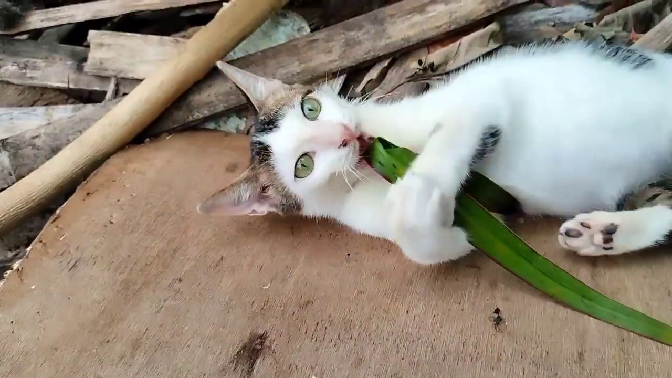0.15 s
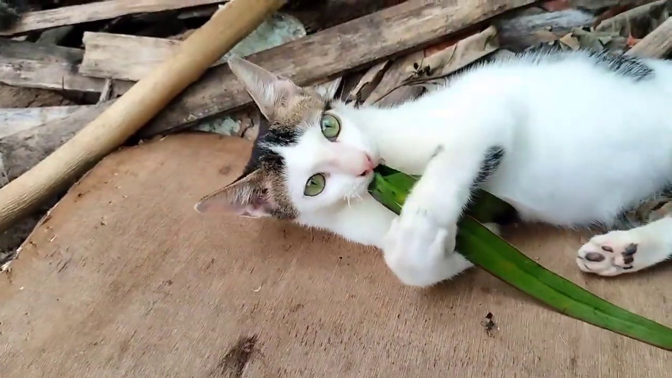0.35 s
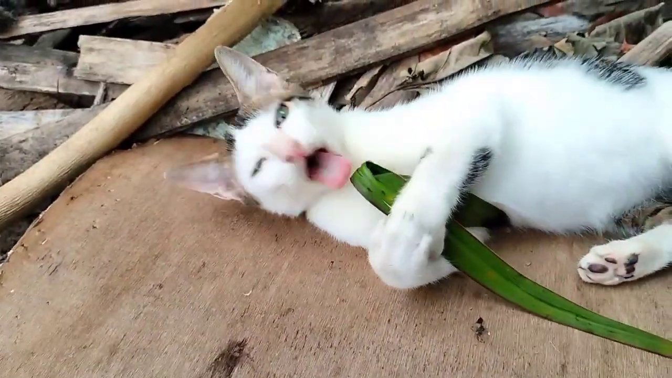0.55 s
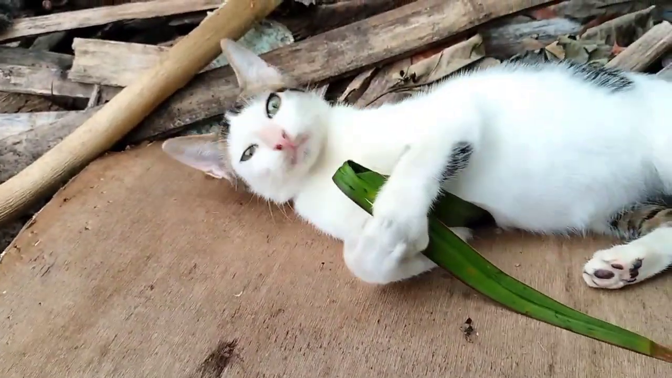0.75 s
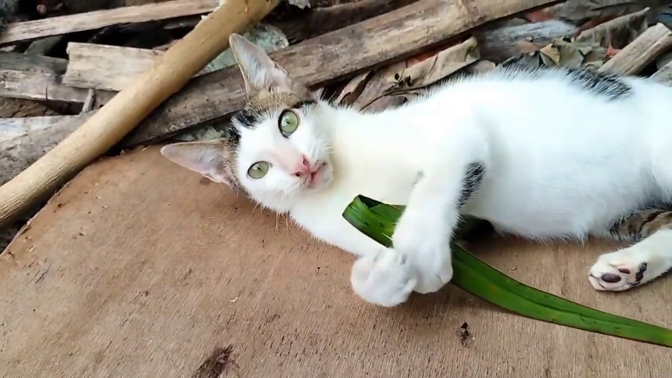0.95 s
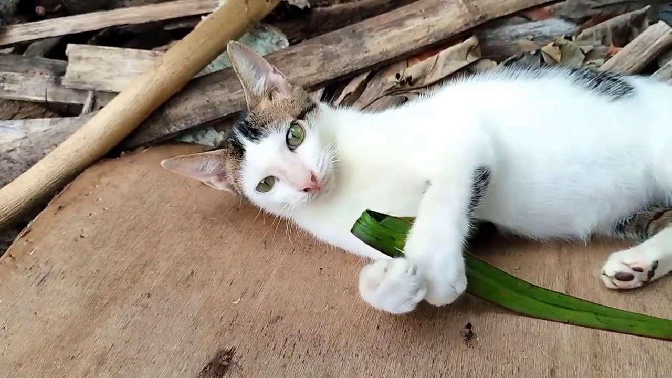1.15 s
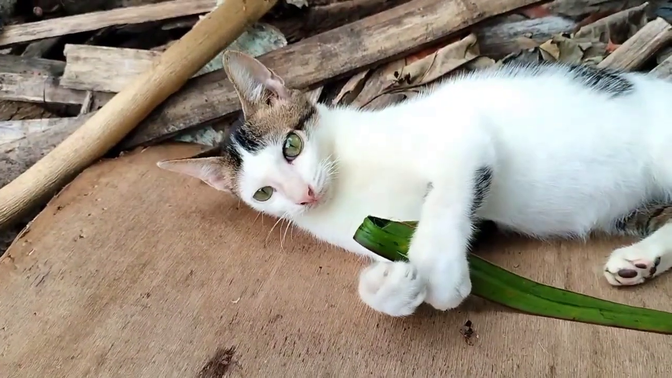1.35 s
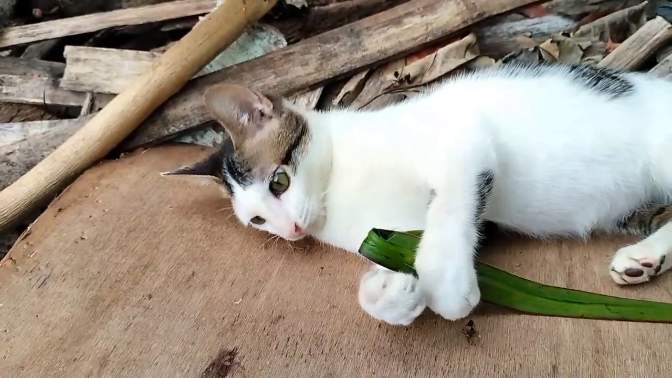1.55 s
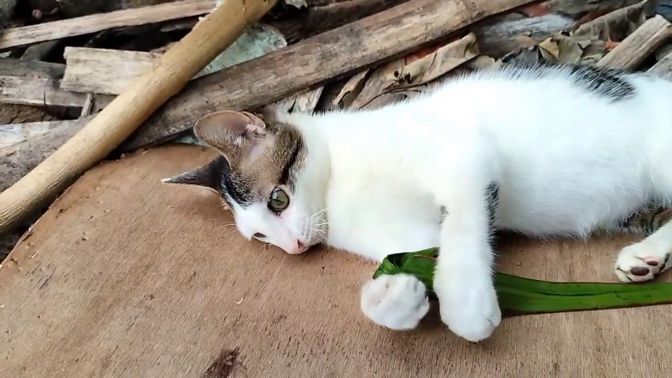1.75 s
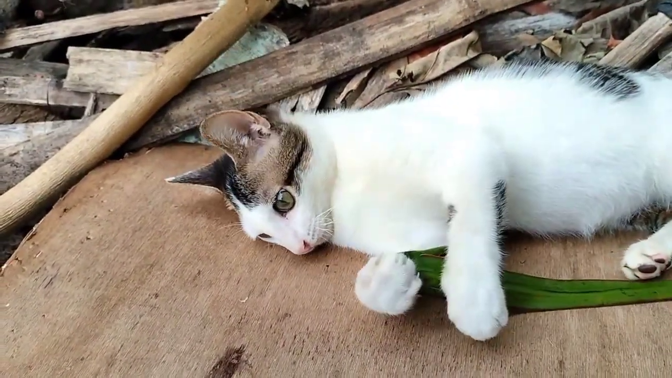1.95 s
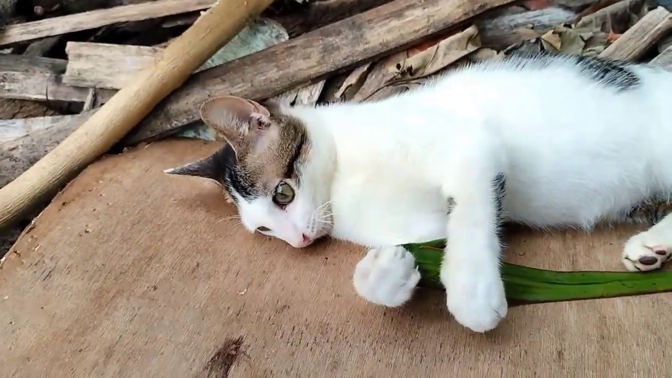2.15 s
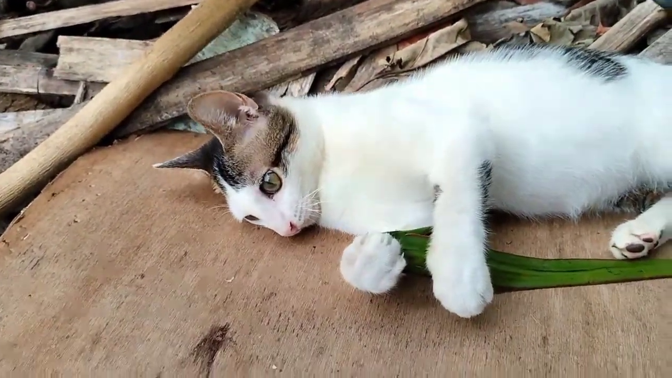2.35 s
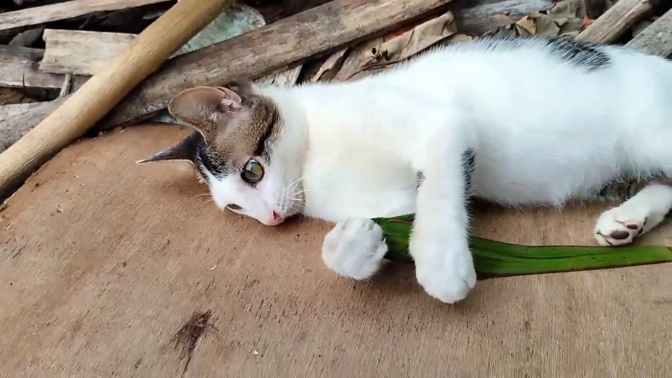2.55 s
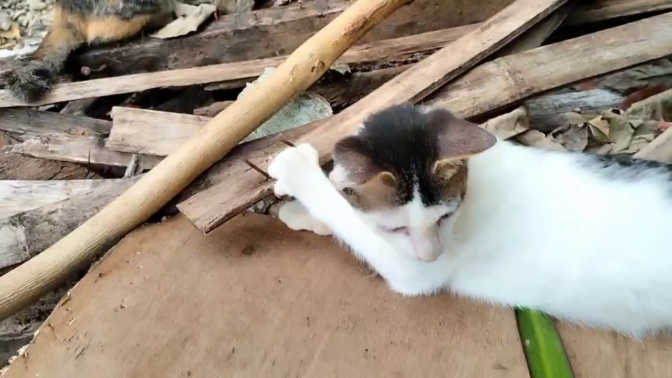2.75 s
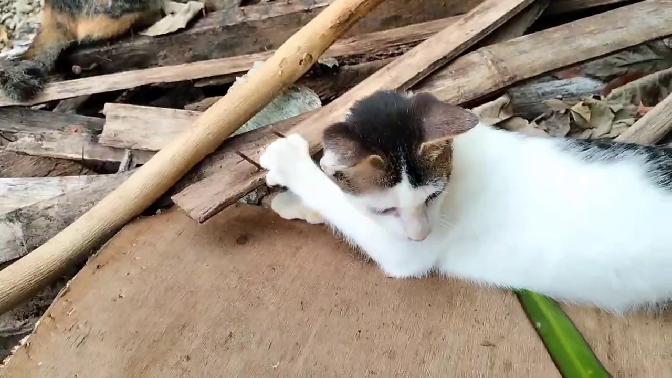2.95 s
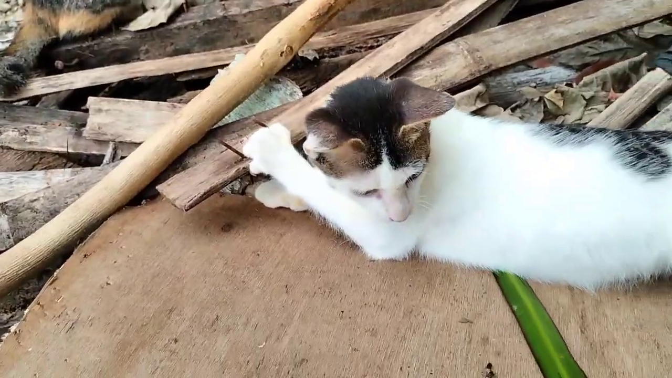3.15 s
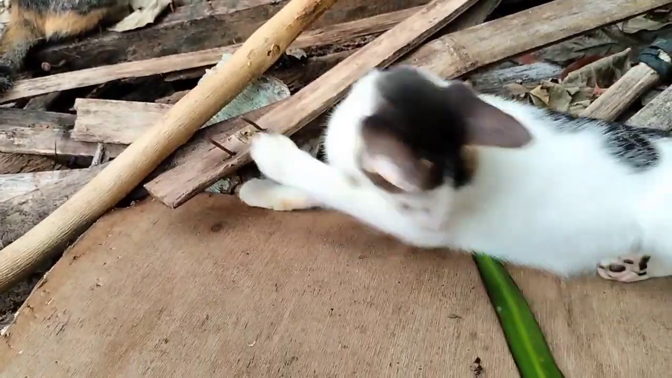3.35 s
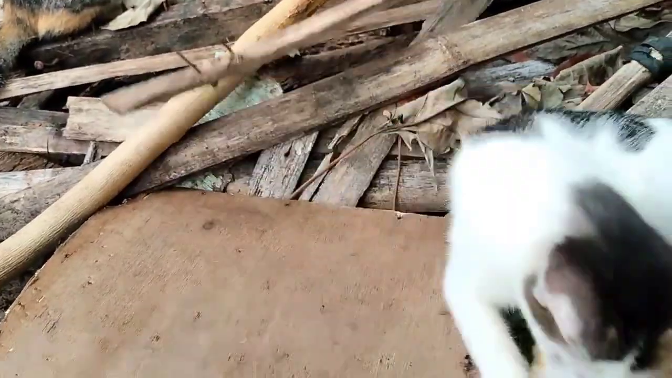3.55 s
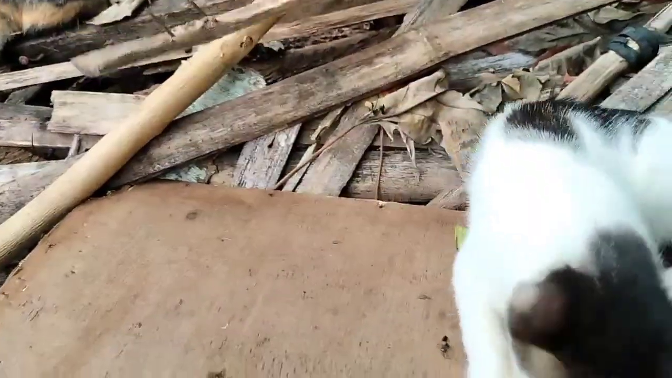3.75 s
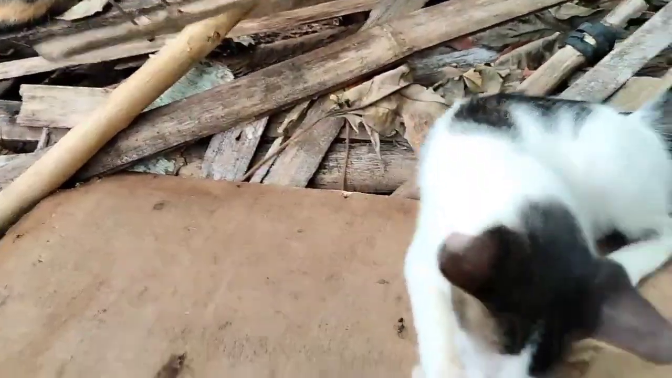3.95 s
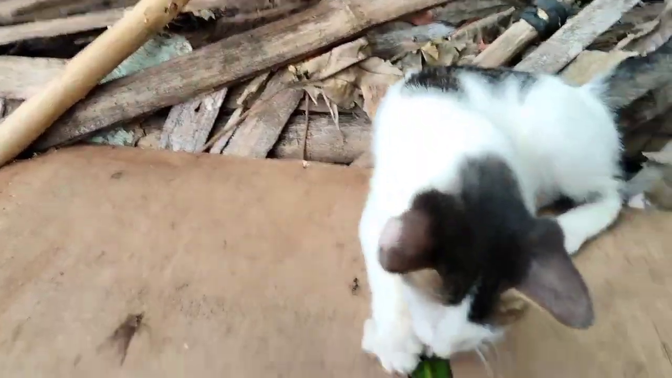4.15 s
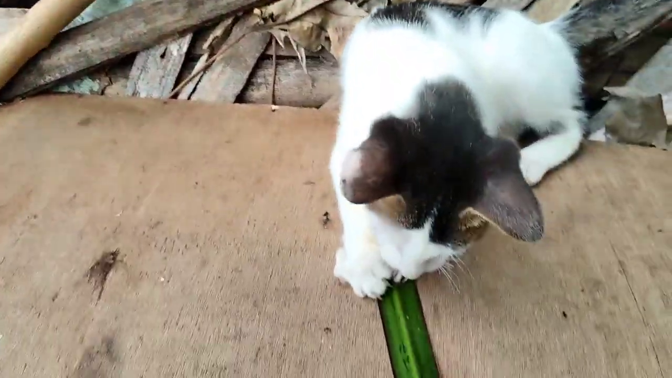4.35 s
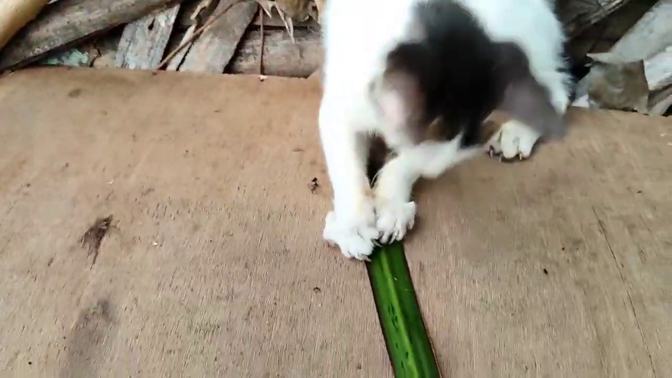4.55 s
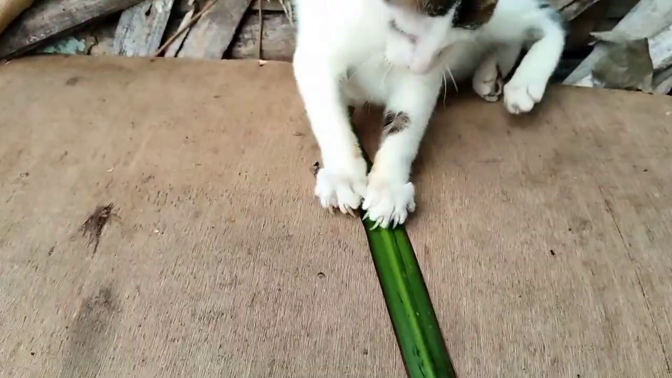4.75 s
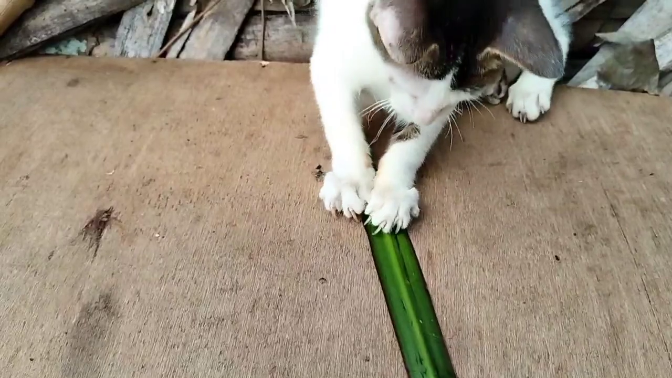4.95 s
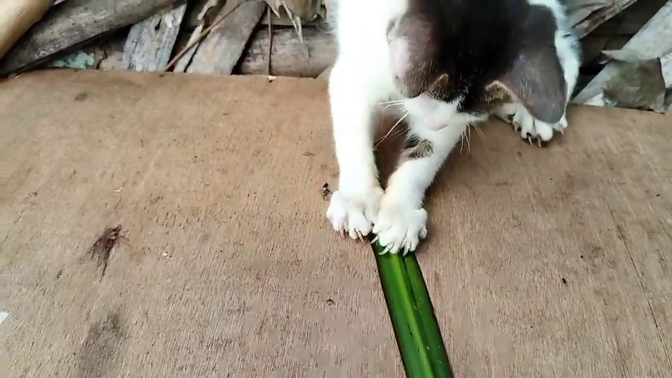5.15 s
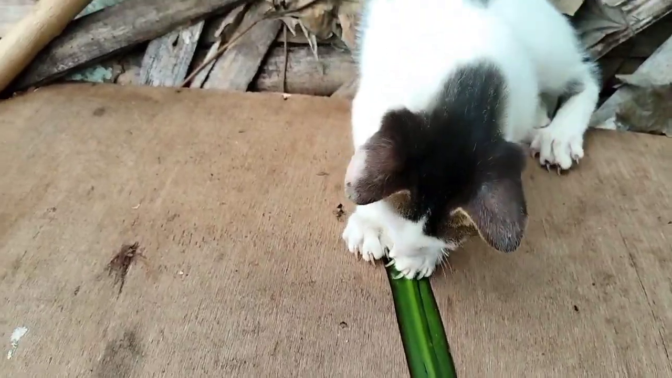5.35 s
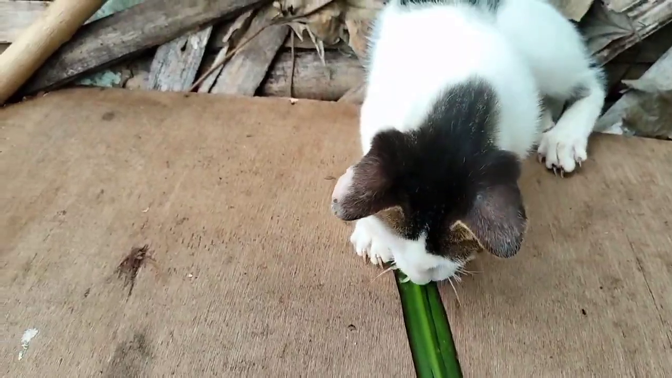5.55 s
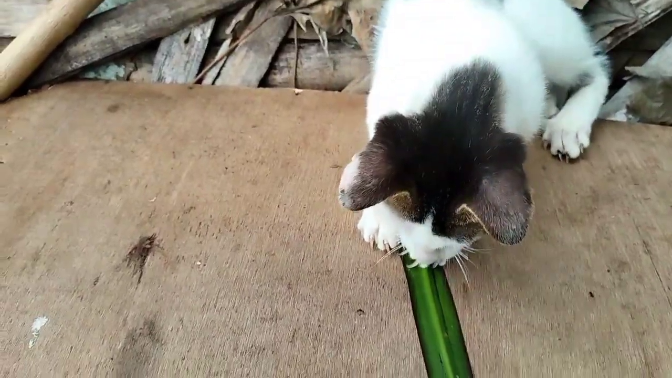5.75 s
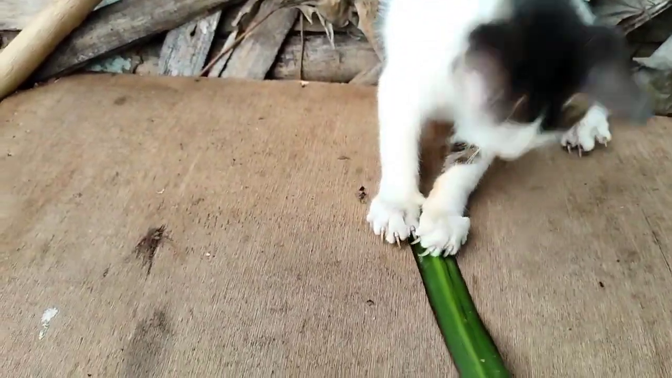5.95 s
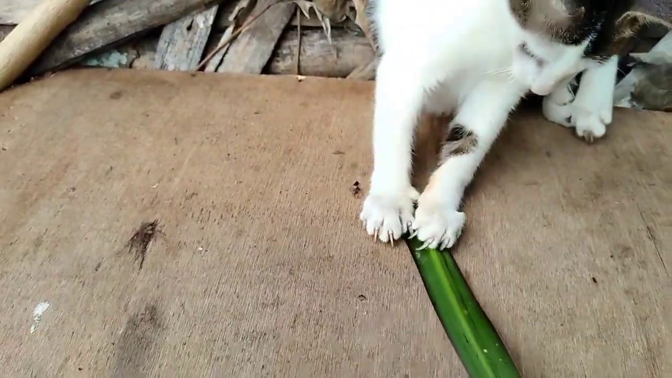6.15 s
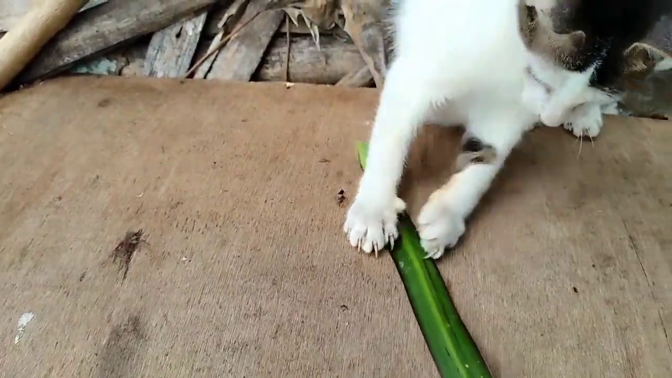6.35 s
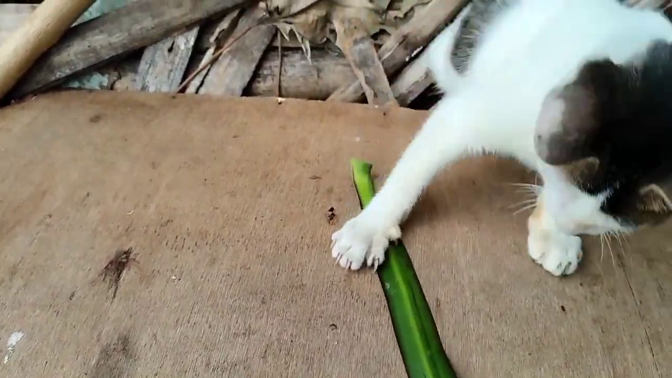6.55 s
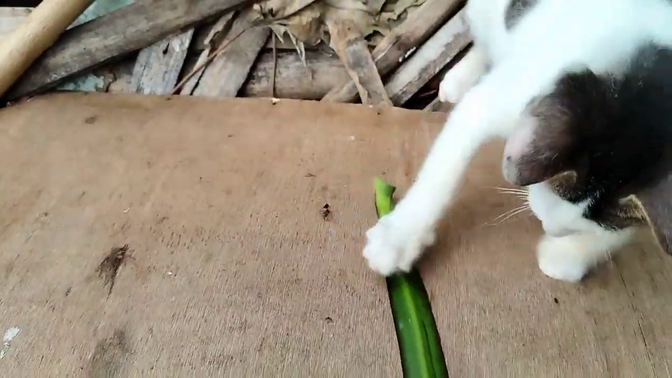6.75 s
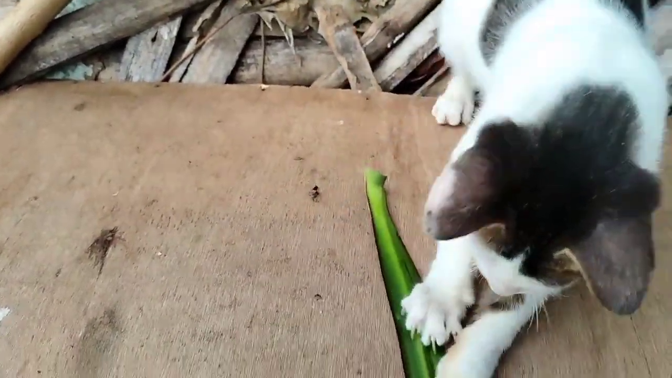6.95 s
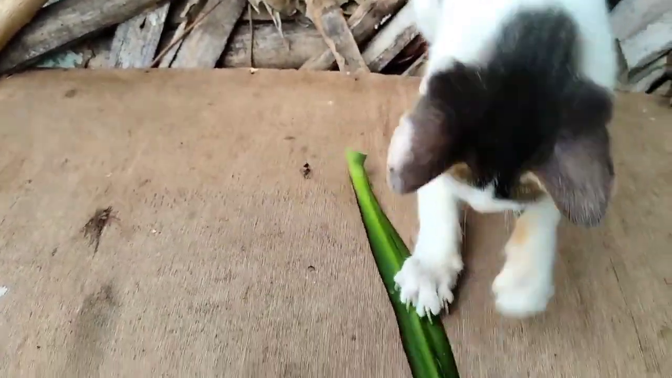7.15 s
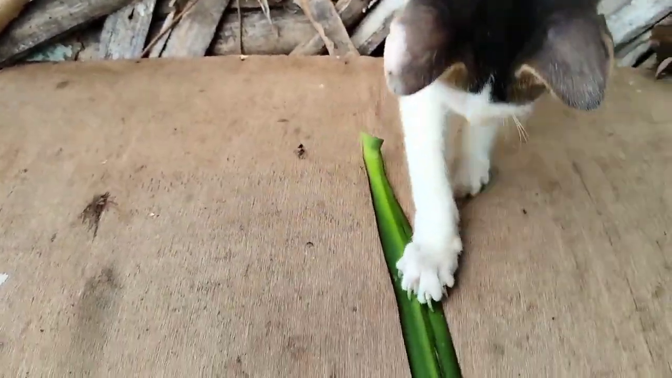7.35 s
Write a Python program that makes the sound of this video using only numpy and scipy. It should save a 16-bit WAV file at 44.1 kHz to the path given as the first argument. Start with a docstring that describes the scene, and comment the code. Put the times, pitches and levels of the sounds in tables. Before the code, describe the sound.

For the first three seconds, small birds chip, twitter and give short high whistles in a slightly echoing yard, over a faint outdoor hiss and rumble. Three soft, distant broom-like swishes pass at about 0.7, 1.4 and 2.2 seconds. The background dips briefly just before 3 seconds. Around 3.6 seconds a kitten pounces on a thin wooden board close to the microphone: a loud, hollow double thump with a short low shudder and sharp cracks of claws and a stiff leaf. From about 4.6 to 5.4 seconds come lighter dry snaps and rasping scratches that knock hollowly in the wood. The birds continue more faintly, with a few rising trills between 5 and 6 seconds. Scratching picks up again from 6 seconds, building to another thump and sharp crack at about 6.9, then a few last snaps and scrapes around 7.2 seconds.

```python
"""A kitten pounces on a thin wooden board outdoors and scratches at a long stiff leaf, close to a phone. Its
paws thump the board's low modes and leave it shuddering; claws and leaf snap and rasp in stick-slip strokes
that knock hollowly in the wood. Behind it, birds chip and whistle in an echoing yard and something like a broom
swishes far off. The background noise rises and falls as it goes."""
import sys
import numpy as np
from scipy import signal
from scipy.fft import rfft, irfft
from scipy.io import wavfile
from scipy.ndimage import uniform_filter1d

SR = 44100
rng = np.random.default_rng(int(sys.argv[2]) if len(sys.argv) > 2 else 0)


def to_wav(s):
    """Save 16-bit WAV."""
    ch = np.atleast_2d(s).T  # columns
    pcm = np.round(np.clip(ch, -1, 1) * 32767)  # PCM
    wavfile.write(sys.argv[1], SR, pcm.astype(np.int16))


N = 325899


def undb(db):
    return 10 ** (np.asarray(db) / 20)


def unit(x):
    return x / np.sqrt(np.mean(x ** 2))


def pan(db):
    """Stereo gains for a left-minus-right balance in dB."""
    return undb(np.array([[db], [-db]]) / 2)


def curve(rows):
    """An automation lane for each column after time, then a soft gate over the table's span."""
    times, *columns = np.transpose(rows)
    t = np.arange(N) / SR
    gate = np.clip(np.minimum(t - times[0], times[-1] - t) / 0.015 + 1, 0, 1)
    return [np.interp(t, times, column) for column in columns] + [gate]


def stroke(peak_s, rise_s, fall_s):
    """Envelope with a slightly rounded peak, 30 dB down at rise_s before it and fall_s after."""
    late = np.arange(N) / SR - peak_s
    return undb(-30 * np.maximum(-late / rise_s, late / fall_s) ** 1.154)


def colour(x, shape):
    """Minimum-phase EQ of unit energy, drawn through (Hz, dB) points."""
    hz, db = np.transpose(shape)
    f = np.maximum(np.fft.rfftfreq(4096, 1 / SR), 1)
    cepstrum = irfft(np.interp(np.log(f), np.log(hz), db) * np.log(10) / 20)
    cepstrum[1:2048] *= 2  # folding makes the filter causal
    cepstrum[2049:] = 0
    impulse = irfft(np.exp(rfft(cepstrum)))[:2048]
    impulse /= np.sqrt(np.sum(impulse ** 2))
    return signal.fftconvolve(np.atleast_2d(x), impulse[None], axes=1)[:, :N]


def band(x, lo_hz, hi_hz):
    return signal.sosfilt(signal.butter(2, [lo_hz, hi_hz], "bandpass", fs=SR, output="sos"), x)


def ring(x, hz, t60):
    """One decaying mode; a unit impulse rings with unit size."""
    r, w = np.exp(-np.log(1000) / (t60 * SR)), 2 * np.pi * hz / SR
    return signal.lfilter([0, r * np.sin(w)], [1, -2 * r * np.cos(w), r * r], x)


def walk(rate_hz):
    """Slewed random sample-and-hold, with a spread near 1."""
    hold = int(SR / rate_hz)
    steps = np.repeat(rng.standard_normal(N // hold + 1), hold)
    return 1.2 * uniform_filter1d(steps, hold)[:N]


def stereo_noise(width):
    """White noise, mono at width 0 and unrelated left and right at 1."""
    mid, side = rng.standard_normal((2, N))
    return (mid + width * side * np.array([[1], [-1]])) / np.sqrt(1 + width ** 2)


def grit(per_s, spread_db, width):
    """Friction texture: noise broken into slips of very uneven size."""
    slips = (rng.random(N) < per_s / SR) * undb(spread_db * rng.exponential(size=N))
    envelope = signal.lfilter([1], [1, -np.exp(-1 / (0.0021 * SR))], slips)
    return unit(stereo_noise(width) * (envelope + 0.29 * np.mean(envelope)))


# Low-end EQ of the background noise, also of the board's shudder: f/Hz, level/dB
RUMBLE_EQ = [(15, -49.5), (25, -15), (43, -16.5), (114, 0), (184, -4.5), (249, -3.5), (317, -12),
             (400, -13.5), (520, -49.5), (880, -120)]
# EQ of the background noise's mids and treble: f/Hz, level/dB
NOISE_EQ = [(15, -37), (25, -7), (242, 1), (335, -10), (545, -12), (2000, -14), (2480, -16), (4490, -11.5),
            (7110, -12.5), (8360, -21), (9570, -38.5), (11900, -42), (16000, -35.5)]
# Background noise level, rising and falling over time: # t/s, bass/dB, mids/dB, treble/dB
NOISE_FADERS = [(0, -68.5, -67.5, -54), (.18, -72.5, -74, -72.5), (.48, -69, -71.5, -57.5),
                (.8, -71, -73, -69.5), (1.05, -68, -72.5, -64.5), (1.3, -71, -72.5, -68),
                (1.68, -66.5, -70, -60), (2.05, -72, -75.5, -65.5), (2.36, -68, -72, -57.5),
                (2.7, -70.5, -73, -63), (2.98, -81, -84.5, -72), (3.3, -81.5, -83.5, -77),
                (3.62, -67.5, -76, -58), (3.95, -78.5, -81.5, -76), (4.45, -81, -80.5, -75),
                (4.75, -75, -74.5, -65), (5.05, -79.5, -80, -88), (5.3, -76.5, -79, -70),
                (5.6, -83.5, -85.5, -85), (5.95, -79.5, -84, -72.5), (6.1, -75, -78, -72.5),
                (6.42, -83, -78, -72.5), (6.73, -74.5, -69, -63), (7.1, -80.5, -69.5, -74.5),
                (7.39, -68.5, -62.5, -65)]


def background_noise():
    """Noise bed: narrow bands flicker independently, wider in stereo toward the top."""
    ranges = [(23.7, 340, RUMBLE_EQ), (333.3, 2370, NOISE_EQ), (2265, 14900, NOISE_EQ)]
    out = 0
    for (lo_hz, hi_hz, eq), db in zip(ranges, curve(NOISE_FADERS)[:3]):
        layer = 0
        edges = np.geomspace(lo_hz, hi_hz, num=11)
        for lower, upper in zip(edges, edges[1:]):
            flicker = undb(3.08 * walk(12))
            noise = stereo_noise(width=min(lower / 2500, .9) + 0.67)
            layer = layer + flicker * band(noise, lower, upper)
        out = out + undb(db) * unit(colour(layer, eq))
    return out


def chip(db, hz, length_s, pan_db, fall):
    """A raspy bird note: slurred, unsteady in pitch, with a fast throb that adds sidebands."""
    progress = np.linspace(0, 1, num=int((length_s + 0.0065) * SR))
    jitter = np.interp(progress * length_s * 900, np.arange(64), rng.standard_normal(64))
    phase = 2 * np.pi * np.cumsum(hz * (1 + fall * (.5 - progress) + .032 * jitter)) / SR
    throb = 1 + 0.11 * np.sin(phase * 0.044)
    return undb(db) * np.sin(np.pi * progress) * throb * np.sin(phase) * pan(pan_db)


def glides(rows, flutter, throb_db, swell_db, fade_db):
    """Tones that glide, swell and fade, wavering in pitch and strength."""
    out = 0
    for start, peak, end, from_hz, to_hz, db, *overtone in rows:
        level, gate = curve([(start, db - swell_db), (peak, db), (end, db - fade_db)])
        hz = curve([(start, from_hz), (end, to_hz)])[0]
        tone = np.sin(2 * np.pi * np.cumsum(hz * (1 + flutter * walk(120))) / SR)
        octave = sum(overtone) * (2 * tone ** 2 - 1)
        out = out + gate * undb(level + throb_db * walk(50)) * (tone + octave)
    return out


# Fader ride on the far flock: t/s, level/dB
FLOCK_FADER = [(0, -51.5), (.2, -71.5), (.5, -61), (1.1, -59), (1.4, -57.5), (1.7, -55), (2.1, -73),
               (2.7, -52), (2.85, -99.5), (3.4, -84), (4.2, -77.5), (4.6, -74), (5.0, -80), (5.3, -74),
               (5.6, -91.5), (5.95, -71.5), (6.4, -80), (7.39, -64.5)]


def flock(count):
    """Far birds twitter: a cloud of tiny chips, scattered in time, pitch and pan."""
    out, level = np.zeros((2, N)), curve(FLOCK_FADER)[0]
    for when, pitch, distance, length, side, slur in rng.random((count, 6)):
        i = int(when * (N - 3000))
        note = chip(db=level[i] - 8 * distance, hz=2500 * 3 ** pitch, length_s=.004 + 0.014 * length,
                    pan_db=8 * side - 6, fall=.5 * slur - .2)
        out[:, i:i + note.shape[1]] += note
    return out


def yard_echo(x, t60=0.32):
    """Diffuse reflections around the yard: a decaying noise tail after 4 ms of pre-delay."""
    age = np.arange(int(.6 * SR)) / SR
    tail = rng.standard_normal((2, len(age))) * np.exp(-np.log(1000) * age / t60) * (age > .004)
    tail /= np.sqrt(np.sum(tail ** 2, axis=1, keepdims=True))
    return signal.fftconvolve(x, tail, axes=1)[:, :N]


# Faint far calls and, at 7.02 s, a short, narrow wooden knock ringing near 950 Hz:
# start/s, peak/s, end/s, from/Hz, to/Hz, level/dB, octave overtone/ratio
FAINT_TONES = [(0, .01, 0.12, 1018, 988, -57.5, 0.23), (.14, .33, 0.38, 984, 990, -58, 0.2),
               (.4, .48, 0.58, 974, 985, -71.5, 0.64), (.68, .76, 1.02, 979, 999, -67, 0.95),
               (.73, .8, 1.03, 705, 685, -71.5, 1.3), (3.14, 3.2, 3.3, 3444, 3397, -72, 0.042),
               (3.35, 3.44, 3.52, 4080, 3980, -59.5, 0.2), (4.08, 4.4, 4.56, 1074, 1131, -76.5, 1.5),
               (6.16, 6.19, 6.33, 3998, 3950, -54.5, 0.014), (6.6, 6.9, 7.5, 1790, 1793, -62.5, 0.48),
               (7.02, 7.064, 7.07, 963, 937, -58, 0.26)]
# Far rising trills: start/s, peak/s, end/s, from/Hz, to/Hz, level/dB
TRILLS = [(4.88, 4.97, 5.2, 3800, 7060, -64.5), (5.12, 5.16, 5.3, 4380, 6510, -56),
          (5.6, 5.7, 5.86, 3770, 6890, -66.5), (5.8, 5.84, 5.98, 4255, 6380, -57.5)]
# Near held whistles: start/s, peak/s, end/s, from/Hz, to/Hz, level/dB
WHISTLES = [(.225, .28, 0.42, 4723, 4568, -40.5), (.29, .35, 0.42, 4730, 5000, -45),
            (1.55, 1.67, 1.76, 4184, 3830, -35.5), (1.68, 1.73, 1.904, 4000, 3996, -46.5),
            (2.2, 2.278, 2.36, 4080, 3890, -43), (2.33, 2.38, 2.53, 3970, 3957, -46),
            (2.3, 2.45, 2.66, 4260, 4280, -55.5)]
# Near single chips: t/s, level/dB, f/Hz, length/s, pan/dB
CHIPS = [(0.216, -58, 3690, 0.015, 1), (0.477, -56.5, 3110, 0.0076, 1), (0.581, -49, 3700, 0.019, 3),
         (0.867, -46.5, 3580, 0.0087, 5), (1.08, -54.5, 3090, 0.015, 2), (1.092, -43.5, 4110, 0.034, 3),
         (1.366, -50, 3580, 0.026, 5), (1.583, -53.5, 2750, 0.028, -2.5), (2.334, -56, 3330, 0.043, 8),
         (2.388, -53, 2785, 0.02, -3), (2.721, -52.5, 3650, 0.0037, 4), (4.051, -67, 4150, 0.043, -3),
         (4.133, -68.5, 4970, 0.044, -4.5), (4.286, -58, 3950, 0.022, 1.5),
         (4.521, -58.5, 5300, 0.027, -7.5), (4.552, -60, 4660, 0.013, -6),
         (5.188, -66.5, 2635, 0.0053, -11.5), (5.705, -65, 4100, 0.016, 3)]
# Cues for one bird's falling phrase: t/s, note 1/dB, note 2/dB, note 3/dB, slide/dB, pan/dB
PHRASE_CUES = [(0.424, -44.5, -50, -50.5, -43, -7), (.944, -42, -46.5, -51.5, -43, -5),
               (1.543, -41.5, -47, -49, -42.5, -7), (2.157, -44.5, -50, -59.5, -50, -7),
               (2.643, -47.5, -53.5, -47.5, -62, -5), (5.154, -59.5, -56, -53.5, -69, -4),
               (5.835, -63.5, -55.5, -52.5, -74, -5.5)]
# The phrase's three notes: delay/s, f/Hz, length/s, pitch fall/ratio
PHRASE_NOTES = [(0, 6960, 0.0081, 0.026), (0.024, 5650, 0.011, .1), (0.048, 4130, .011, .05)]
# The slide slurred over them, timed from the cue: start/s, peak/s, end/s, from/Hz, to/Hz
PHRASE_SLIDE = (.012, 0.036, .062, 6850, 3200)


def birds_and_knock():
    """Near birds arrive both direct and as echo; far ones and one wooden knock mostly as echo."""
    notes, slides = [(*row, .06) for row in CHIPS], []  # single chips fall 6% in pitch
    for t, *note_dbs, slide_db, pan_db in PHRASE_CUES:
        for db, (delay, hz, length, fall) in zip(note_dbs, PHRASE_NOTES):
            notes.append((t + delay, db, hz, length, pan_db, fall))
        slide_times = t + np.array(PHRASE_SLIDE[:3])
        slides.append((*slide_times, *PHRASE_SLIDE[3:], slide_db))
    near = np.zeros((2, N))
    near += glides(WHISTLES, flutter=0.00692, throb_db=2.36, swell_db=18.2, fade_db=17.5)
    for t, *settings in notes:
        i, note = int(t * SR), chip(*settings)
        near[:, i:i + note.shape[1]] += note
    far = flock(count=1100)
    far += glides(FAINT_TONES, flutter=0.024, throb_db=4.5, swell_db=15, fade_db=14)
    far += glides(TRILLS + slides, flutter=0.075, throb_db=4.7, swell_db=16.6, fade_db=17.5)
    return undb(-2.5) * near + undb(-13.5) * far + yard_echo(near + far)


# Broom-like strokes: peak/s, level/dB
SWISHES = [(.74, -53), (1.44, -52), (2.17, -53)]
# Their bright, bristly EQ: f/Hz, level/dB
SWISH_EQ = [(900, -29.5), (1800, -17.5), (3500, -12.5), (7000, -8.5), (8300, -15), (9400, -21),
            (14800, -22.5), (15800, -25)]


def swishes():
    """Distant bristles sweep in swells of fine-grained friction noise."""
    envelope = sum(undb(db) * stroke(t, rise_s=0.23, fall_s=0.288) for t, db in SWISHES)
    return envelope * colour(grit(4000, 1.5, width=0.88), SWISH_EQ)


# The board's midrange modes, a low group and a high group: f/Hz, nominal bandwidth/Hz, level/dB
KNOCK_MODES = [(375, 110, 3.5), (560, 57, 0.), (666, 55, -6)], [(940, 160, -2), (1115, 143, -0.5),
               (1234, 180, 0.5), (1500, 88, -6.5)]


def wood_knock(low_drive, high_drive):
    """The board's hollow mids; where it is touched decides which group of modes speaks."""
    out = 0
    for drive, modes in zip((low_drive, high_drive), KNOCK_MODES):
        for k, (hz, width_hz, db) in enumerate(modes):
            gain = (-1) ** k * undb(db) * np.sqrt(width_hz)
            out = out + gain * ring(drive, hz, t60=1.96 / width_hz)
    return band(band(out, 380, 2100), 380, 2100) / 90


# The board's low modes: f/Hz, level/dB, T60/s
BOARD_MODES = [(114.6, -29, 0.24), (168.2, -4.5, 0.17), (217.6, 14, 0.076), (287.4, 11, .14),
               (427.7, 5.5, 0.18), (495, 4.5, .08)]
# Paw landings: t/s, level/dB, contact/ms, upper-mode trim/dB
LANDINGS = [(3.456, -52.5, 3.0, -12.5), (3.562, -12.5, 2.7, -31), (3.622, -11.5, 3.1, -10.5),
            (3.698, -40, 3.7, -5), (3.819, -35, 3.7, -20), (4.656, -49, 2.1, -10), (4.8, -49, 2.45, -11),
            (6.588, -35, 1.74, -10.5), (6.621, -38, 1.8, -12.5), (6.794, -52, 4.1, -12),
            (6.915, -18, 5.8, -10.5), (6.95, -31.5, 2.3, -14.5), (7.01, -48.5, 3.1, -13),
            (7.158, -51.5, 2.3, -8), (7.24, -47, 3.9, -5)]


def paw_thumps():
    """A soft paw pushes the board for a few ms; every landing spot stirs the modes differently."""
    out, spots_db = 0, rng.standard_normal((len(LANDINGS), len(BOARD_MODES)))
    for k, (hz, mode_db, t60) in enumerate(BOARD_MODES):
        force = np.zeros(N)
        for (t, db, contact_ms, upper_db), spot_db in zip(LANDINGS, spots_db[:, k]):
            push = np.hanning(int(contact_ms * SR / 1000))
            gain = undb(db + mode_db + upper_db * (k > 1) + spot_db)
            i = int((t + 0.00089) * SR)
            force[i:i + len(push)] += gain * push / push.sum()
        out = out + ring(force, hz, t60)
    # the phone's low cut thins the deepest part of each thump
    out = signal.sosfilt(signal.butter(3, 132, "highpass", fs=SR, output="sos"), out)
    return -undb(-2.5) * out * pan(.3)


def board_shudder(level_db=-32, t60=.45):
    """The deep tail of each thump: the loose board rocks on its support."""
    t = np.arange(N) / SR
    envelope = sum(undb(db + level_db - 60 * np.abs(t - onset) / t60) * (t > onset)
                   for onset, db, *_ in LANDINGS)
    rumble = unit(colour(stereo_noise(width=.15), RUMBLE_EQ))
    return rumble * uniform_filter1d(envelope, size=200)


# Bright EQ of claw and leaf, for scratches and snaps: f/Hz, level/dB
CLAW_EQ = [(880, -27.5), (1500, -12.5), (1720, -6), (2190, -7.5), (2540, -0.5), (3030, -7.5), (3660, -0.5),
           (4780, -4.5), (5330, -4), (5830, -3), (6240, -10), (7320, -11), (9650, -33.5), (14800, -34.5),
           (16000, -40)]
# Fur, claws and leaf dragged over the wood:
# peak/s, rise/s, fall/s, rasp/dB, rub/dB, low knock/dB, high knock/dB, sizzle/dB
SCRATCHES = [(1.82, 0.39, .35, -75, -56, -85, -85, -105), (2.96, 0.063, 0.26, -69, -87, -81, -77.5, -102),
             (3.49, 0.27, 0.44, -58.5, -64.5, -74, -63, -69), (3.62, 0.14, 0.28, -50, -44.5, -49, -65, -80),
             (3.72, .15, 0.14, -50, -62, -53, -70, -74), (4.69, 0.15, 0.39, -57, -60, -77, -66, -78),
             (4.81, 0.14, 0.1, -48.5, -58, -57, -62, -73), (5.001, .1, 0.072, -77, -86, -74, -65, -110),
             (5.2, 0.11, 0.18, -83, -85, -75, -71, -101), (5.324, .2, 0.19, -61, -82.5, -78.5, -78.5, -82),
             (5.93, 0.074, 0.47, -86, -79, -69.5, -62.5, -110), (6.06, .2, 0.12, -71, -80, -79, -73, -95),
             (6.17, 0.059, 0.21, -68, -84, -67, -77, -91),
             (6.338, 0.12, 0.1, -62, -74.5, -66.5, -87, -67.5), (6.49, .1, 0.13, -57, -62.5, -76, -72, -69),
             (6.604, 0.26, 0.22, -57.5, -56, -66, -62.5, -89),
             (6.82, 0.065, 0.13, -53.5, -74, -73, -77, -90), (6.93, .03, 0.18, -49.5, -46, -73, -57, -72),
             (7.222, 0.1, 0.11, -47, -76, -80, -75, -62.5), (7.36, 0.18, 0.28, -62.5, -58.5, -62, -58, -99)]


def scratches():
    """Stick-slip rasp on the wood grain; fur rubs dully, and the leaf adds a fine sizzle on top."""
    power = sum((stroke(t, rise, fall) * undb(levels)[:, None]) ** 2
                for t, rise, fall, *levels in SCRATCHES)
    rasp_env, rub_env, low_env, high_env, sizzle_env = np.sqrt(power)
    patchy = undb(2.5 * walk(60))
    slips = patchy * grit(540, 2.9, width=0.61)
    rasp = colour(patchy * rasp_env * grit(1200, 1.8, width=0.75), CLAW_EQ) * pan(-5.0)
    knock = wood_knock(low_env * slips * pan(2.5), high_env * slips * pan(-1.5))
    rub = patchy * rub_env * unit(band(grit(1000, 1.8, width=0.84), 340, 2400))
    sizzle = sizzle_env * unit(band(grit(2500, 1.5, width=.8), 7500, 15500)) * pan(-1.0)
    return rasp + knock + rub + sizzle


# Claw and leaf snaps: t/s, level/dB, low knock send/dB, high knock send/dB, tail T60/s, pan/dB
SNAPS = [(3.481, -32.5, -19, -14, 0.37, -2.5), (3.5504, -27, -10, -16.5, 0.051, -8),
         (3.559, -31.5, -12, -30, 0.092, -8), (3.6205, -12.5, -4.5, -9.5, 0.049, -5),
         (3.635, -19.5, -29, -13, 0.05, -5), (3.661, -32.5, -1, -7, 0.081, -1.5),
         (3.679, -35.5, -1.5, -2, 0.11, 6), (3.7014, -26, -35, -23, 0.047, -11),
         (3.712, -19, -35, -36, 0.046, -2), (3.723, -25.5, -23, -32, 0.088, 0),
         (3.738, -34.5, -15.5, -43, 0.22, -1), (3.803, -33.5, -36, -55.5, 0.11, -4.5),
         (4.1284, -47, -25, -26.5, 0.057, -2), (4.3291, -47, -29.5, -17.5, 0.068, -4),
         (4.3996, -47.5, -26, -31.5, 0.028, -12), (4.5927, -47.5, -39, -13, 0.052, 1),
         (4.6028, -34, -46, -18, 0.037, -4.5), (4.644, -26, -21, -5, 0.087, -5.5),
         (4.6584, -44, 0, -3, 0.18, -1), (4.7298, -27.5, -30, -24, 0.042, -4),
         (4.766, -47.5, 2.5, -21, 0.086, -8), (4.794, -36.5, 3.5, -13, 0.059, -9),
         (4.8085, -34, -6.5, -7.5, 0.062, -10), (4.845, -47, 3, 8, 0.065, 0),
         (4.908, -53.5, -2, 2, 0.05, -6), (4.933, -53, 12, 11, 0.02, -0.5),
         (5.1712, -52.5, -29, 6, 0.15, -1), (5.196, -53, -27, 8.5, 0.034, -1),
         (5.2424, -60, -23, 7, 0.3, 3), (5.3121, -27.5, -36, -9, 0.053, -2),
         (5.3279, -36, -23, -25.5, 0.13, -2.5), (5.9984, -55.5, 8, 1, 0.085, 2.5),
         (6.038, -43.5, 5.5, 4.5, 0.056, -6), (6.1449, -26.5, -20.5, -12.5, 0.06, -4.0),
         (6.2248, -30.5, -19, -9, 0.047, 3.5), (6.2373, -31.5, -39.5, -26.5, 0.036, -10),
         (6.4822, -30, -20.5, -21, 0.045, -5.5), (6.5042, -32, -8, -24, 0.034, -3.5),
         (6.5822, -31, -4.5, -9, 0.12, 3), (6.5896, -18, -16.5, -33, 0.021, -12),
         (6.6169, -24, -41, -23, 0.095, -5), (6.675, -36, -38, -26, 0.086, -3),
         (6.8135, -33, -15, -18.5, 0.19, -4), (6.8476, -37, -5, -33, 0.03, -4.5),
         (6.8694, -41, -24, -25, 0.039, -13), (6.8774, -59, -12, -16, 0.055, -3.5),
         (6.9122, -21.5, -8, -15, 0.067, -9), (6.9154, -8.5, -20, -23, 0.044, -6),
         (6.9383, -30, -24, 7.5, 0.046, -10), (6.942, -21, -24, 0.5, 0.039, -2),
         (6.951, -12.5, -16, -30, 0.047, -5.5), (7.1676, -36.5, -9, -10, 0.035, -3),
         (7.198, -38, -31, -46, 0.11, -6.5), (7.2181, -24.5, -6, -27, 0.057, -8.0),
         (7.2388, -20.5, -10.5, -17.5, 0.027, -10.5), (7.288, -46, -26, -19, 0.041, 0)]


def snaps():
    """Each snap is a sharp crack and a gritty tail, heard bright in air and as a knock in the wood."""
    t = np.arange(N) / SR
    crack_env, tail_env, low_env, high_env = np.zeros((4, 2, N))
    for onset, db, low_db, high_db, t60, pan_db in SNAPS:
        span = slice(int(onset * SR), int((onset + .3) * SR))
        age = t[span] - t[span][0]
        attack = 1 - np.exp(-age / 0.0014)
        fade = attack * np.exp(-np.log(1000) * age / t60)
        crack_env[:, span] += undb(db) * np.exp(-age / 0.00079) * pan(pan_db)
        tail_env[:, span] += undb(db) * fade * pan(pan_db)
        # powers below 1 let the wood outlast the bright tail
        low_env[:, span] += undb(db + low_db) * fade ** 0.74 * pan(0.33 * pan_db + 6.5)
        high_env[:, span] += undb(db + high_db) * fade ** 0.75 * pan(0.26 * pan_db - 2.5)
    slips = grit(900, 2.0, width=0.35)
    crack = undb(-6) * crack_env * stereo_noise(width=.6)
    tail = undb(-10) * tail_env * grit(1500, 1.3, width=0.84)
    knock = undb(-1) * wood_knock(low_env * slips, high_env * slips)
    return colour(crack + tail, CLAW_EQ) + knock


# Group fader for the ambience, with one brief dip: t/s, level/dB
AMBIENCE_FADER = [(2.74, 3.5), (2.82, -3.5), (2.9, -10.5), (2.97, 6.5)]


def scene():
    """The mix: kitten up front, ambience and swishes behind."""
    kitten = snaps() + scratches() + paw_thumps() + board_shudder()
    ambience = (birds_and_knock() + background_noise()) * undb(curve(AMBIENCE_FADER)[0])
    return kitten + ambience + swishes()


def record(dry, top_hz=15650):
    """The phone cuts the top with a steep low-pass."""
    return signal.sosfilt(signal.ellip(8, .2, 70, top_hz, fs=SR, output="sos"), dry)


dry = scene()
out = record(dry)
to_wav(out)
```